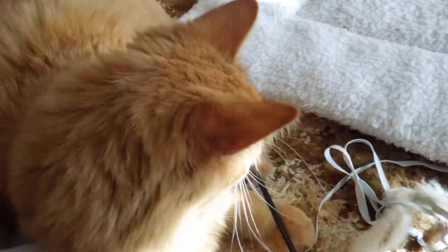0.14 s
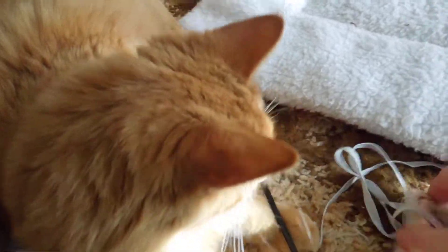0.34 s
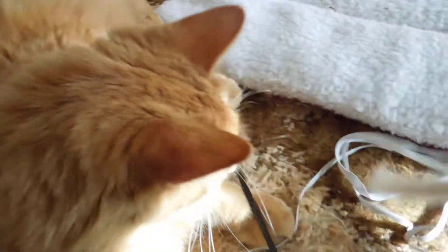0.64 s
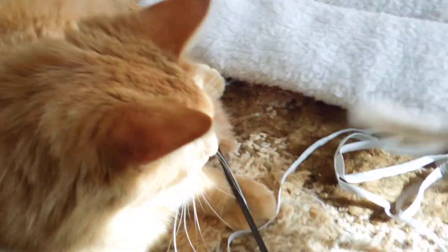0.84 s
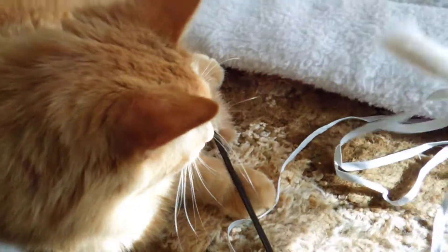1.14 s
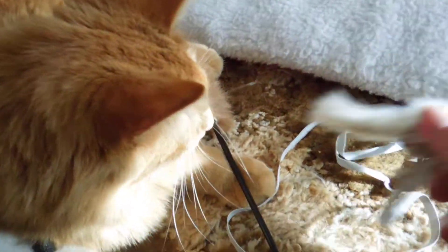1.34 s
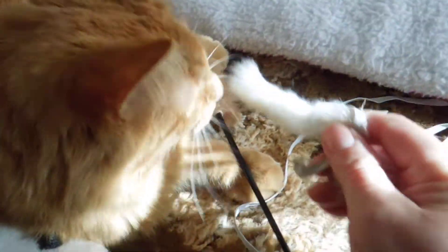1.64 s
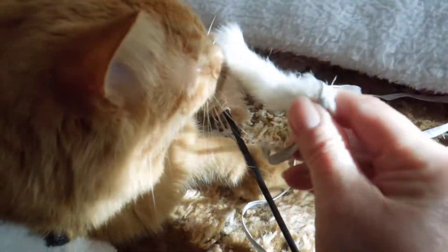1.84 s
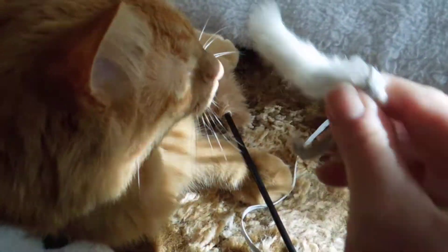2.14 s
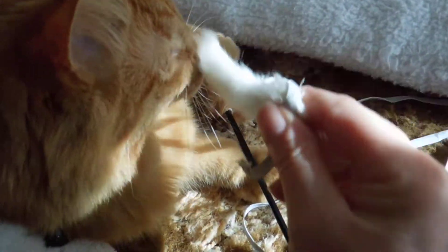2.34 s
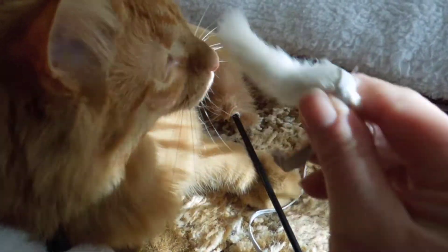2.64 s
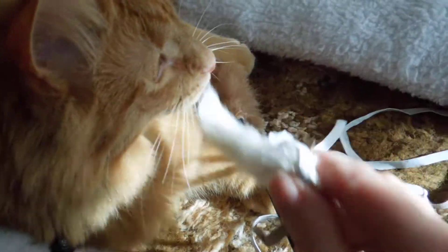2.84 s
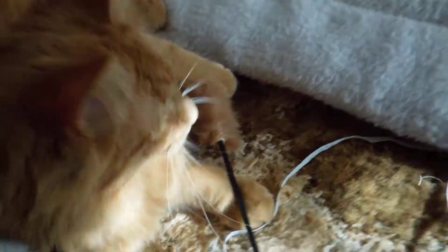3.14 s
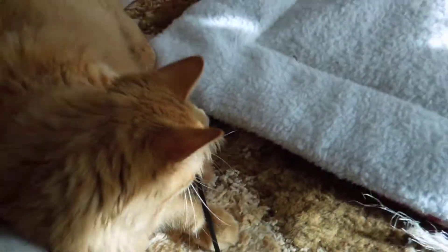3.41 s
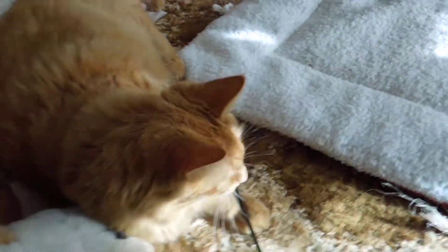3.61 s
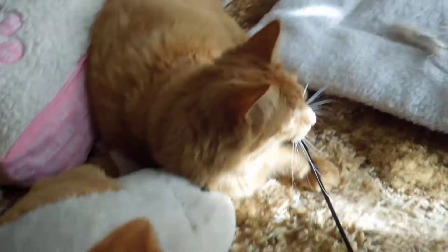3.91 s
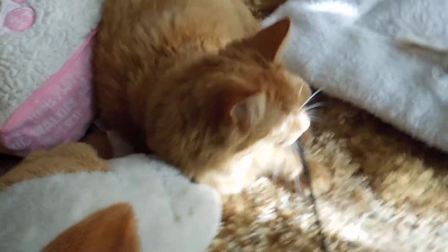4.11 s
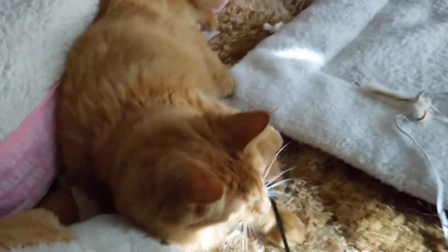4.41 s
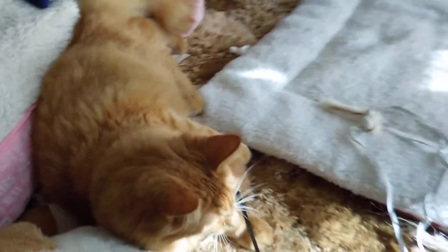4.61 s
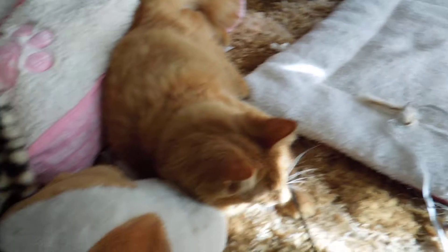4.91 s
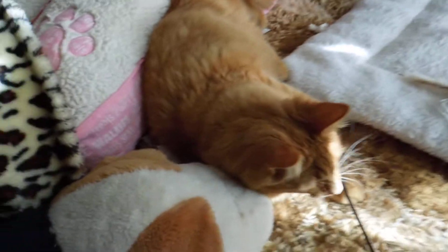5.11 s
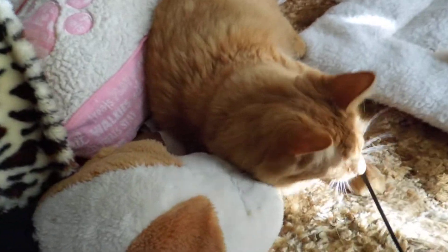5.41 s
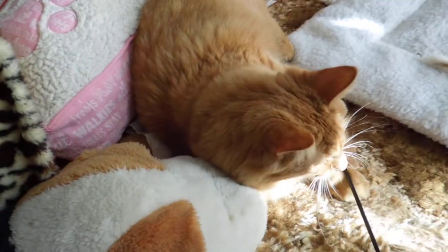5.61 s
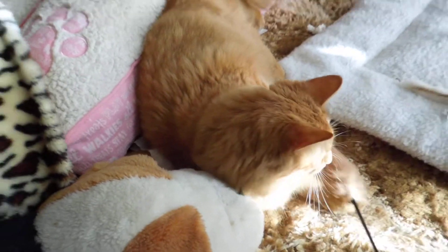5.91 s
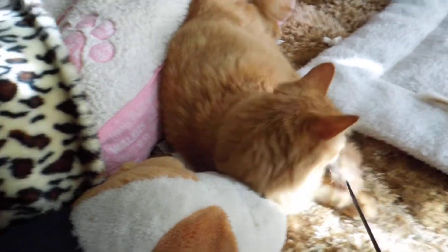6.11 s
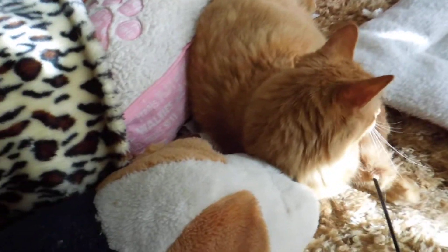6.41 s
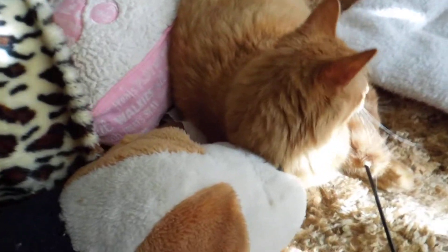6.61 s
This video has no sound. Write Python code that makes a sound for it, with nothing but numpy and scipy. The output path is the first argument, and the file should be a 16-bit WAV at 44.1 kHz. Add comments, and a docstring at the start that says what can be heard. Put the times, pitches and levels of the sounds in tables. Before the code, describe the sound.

Quiet indoor play heard at arm's length through a small stereo camera with low rumble and hiss. A thin crisp plastic-like toy ticks sparsely while fur and ribbon whisper over carpet and towel, with two dull soft bumps. A short group of snaps leads to a dense, sharp crinkle, by far the loudest moment. It falls back to isolated bright clicks, faint rustles and soft handling thumps, with a short dry room tail.

```python
"""Cat with a crinkly wand toy

A cat lies on a carpet and bites and paws a crinkly wand toy, an arm's length from a small camera.
Creases in the toy snap singly or in showers of random clicks, coloured by film, crease and hollow body.
Fur and ribbon brush over carpet and towel as swelling grain noise; soft bumps are short decaying modes.
A soft-furnished room adds a short noise tail; the camera adds hiss and a few low handling rumbles."""
import sys
import numpy as np
from scipy import signal
from scipy.fft import rfft, irfft
from scipy.io import wavfile
from scipy.ndimage import uniform_filter1d

SR = 44100
rng = np.random.default_rng(int(sys.argv[2]) if len(sys.argv) > 2 else 0)


def dump_mix(stems):
    """Bounce the given channels to the path in sys.argv[1] as a 16-bit WAV at rate SR."""
    frames = np.atleast_2d(stems).T  # one column per channel
    limited = np.clip(frames, -1, 1)  # hard clip at full scale
    pcm = np.round(limited * 32767).astype(np.int16)
    wavfile.write(sys.argv[1], SR, pcm)


N = 297675  # length in samples


def undb(db):
    """Decibels to amplitude gain."""
    return 10 ** (np.asarray(db) / 20)


def unit(x):
    """Scale a signal to an energy of one."""
    return x / np.sqrt(np.sum(x ** 2) + 1e-18)


def add(track, start_s, x):
    """Mix a sound into a track from a start time, cut at the end of the track."""
    i = int(start_s * SR)
    track[i:i + len(x)] += x[:max(N - i, 0)]


def read(points, size):
    """Interpolate a (f/Hz, value) table over log frequency onto the bins of a transform."""
    hz, value = np.transpose(points)
    bins_hz = np.fft.rfftfreq(size, 1 / SR)
    return np.interp(np.log(bins_hz + 1), np.log(hz), value)


def colour(x, spectrum, size=1024):
    """Minimum-phase filter: folding the cepstrum forward puts the energy at the onset."""
    cepstrum = irfft(np.log(undb(read(spectrum, size))))
    cepstrum[1:size // 2] *= 2
    cepstrum[size // 2 + 1:] = 0
    impulse = irfft(np.exp(rfft(cepstrum)))
    return signal.fftconvolve(x, impulse)[:len(x)]


def band(x, hz, width_hz):
    """One resonance with a gain of 1 at its centre."""
    b, a = signal.iirpeak(min(hz, SR / 3), hz / width_hz, fs=SR)
    return signal.lfilter(b, a, x)


def grains(n, rate, spread_db):
    """Tiny clicks at random times and of random sign, most weak and a few strong; rate per second."""
    chance = rng.random((n, 3))
    fires = chance[:, 0] < rate / SR
    sign = np.sign(chance[:, 1] - .5)
    size = undb(-spread_db * np.log(np.maximum(chance[:, 2], .05)))  # the floor caps the strongest
    return fires * sign * size


def pair(x, other, likeness):
    """Left and right from two unrelated signals, alike by a (f/Hz, likeness 0-1) table."""
    alike = np.clip(read(likeness, len(x)), 0, 1)
    mid = rfft(x) * np.sqrt((1 + alike) / 2)
    side = rfft(other) * np.sqrt((1 - alike) / 2)
    return irfft(np.array([mid + side, mid - side]), len(x))


def toy():
    """Creases buckle singly or in showers; returns the direct sound and the part that fills the room."""
    # ringing of toy and wand, added to the plain sound: f/Hz, width/Hz, level/dB
    rings = [(1360, 97, -29), (3010, 18, -1.5), (4590, 40, 0), (6600, 90, -19), (7000, 62, 0),
             (7740, 100, -1), (8300, 70, 2)]
    snap_room_db = -5.5  # a single snap fills the room less than a shower does
    low_hz = 325  # the toy is too small to radiate below this

    single, showers = snaps(), scrunches()
    out = np.array([single + showers, undb(snap_room_db) * single + showers])
    highpass = signal.butter(2, low_hz, "high", fs=SR, output="sos")
    out = signal.sosfilt(highpass, out)
    return out + sum(undb(db) * band(out, hz, width_hz) for hz, width_hz, db in rings)


def snaps(buckle_s=0.00039, rattle_s=0.0029, rattle_db=-8):
    """One crease buckles as a very short noise burst, and its neighbours rattle as they give way."""
    # single snaps: t/s, level/dB (energy as if held over one millisecond), crease pitch f/Hz,
    # hollow body against film/dB
    snap_list = [(0.5184, -34, 2480, -6), (0.5219, -28.5, 5800, -5), (0.5894, -32.5, 10200, -18),
                 (1.3196, -41, 9100, -20), (2.1996, -41.5, 7560, -3), (2.9941, -37.5, 5300, -5),
                 (3.0492, -36, 10000, -8), (3.3944, -26, 1500, -14), (3.4004, -27.5, 7900, -13),
                 (3.4557, -31.5, 9100, -7), (3.4583, -38, 1500, -3), (3.4670, -37, 10400, -18),
                 (3.697, -40, 5100, -9), (3.9602, -34, 8500, -17), (4.2185, -20.5, 8150, -15),
                 (4.2474, -17, 5500, -11.5), (4.2565, -13.5, 9600, -25), (4.2621, -14, 7300, -24),
                 (4.2664, -9.5, 7660, -27), (4.3030, -18.5, 11300, -7), (4.4506, -30, 8650, -15),
                 (4.7770, -30.5, 6200, -12), (5.0158, -27, 10700, -21), (5.8065, -25.5, 11800, -18),
                 (5.8113, -36, 5200, -10), (5.8224, -26, 11600, -24)]
    out = np.zeros(N)
    t = np.arange(SR // 10) / SR
    millisecond = SR / 1000  # in samples
    for s, db, hz, body_db in snap_list:
        buckle = unit(rng.choice([-1, 1], len(t)) * np.exp(-t / buckle_s))
        rattle = unit(grains(len(t), 6400, 15.0) * np.exp(-t / rattle_s))
        push = buckle + undb(rattle_db) * rattle
        snap = crease(push, hz, body_db, width_hz=820, pitch_db=0.0)
        add(out, s, undb(db) * np.sqrt(millisecond) * snap)
    return out


def scrunches(lead_s=.035):
    """Pressure grows to a peak and relaxes; tiny creases and a few larger cracks follow it."""
    # squeezes of the toy: peak t/s, rise/s, fade/s, peak level/dB, crease pitch f/Hz,
    # hollow body against film/dB
    squeezes = [(3.3957, 0.00035, 0.017, -34.5, 11200, -8), (3.699, .002, 0.022, -43, 5130, -9),
                (4.197, .0003, 0.0088, -28, 7900, -5), (4.221, 0.0084, 0.034, -26, 8900, -11.5),
                (4.265, 0.015, 0.015, -22, 7400, -12), (4.303, 0.0079, 0.019, -21, 10400, -16),
                (4.322, 0.0075, 0.0094, -22.5, 9200, -11.5), (4.41, .02, 0.046, -42.5, 10100, -8.5),
                (5.0142, 0.00085, .013, -27, 7400, -17.5), (5.603, 0.0033, 0.013, -41, 11000, -20),
                (5.8055, 0.00053, 0.017, -29.5, 6350, -21), (5.934, 0.0032, 0.0043, -39.5, 9000, -15),
                (6.014, 0.012, 0.017, -49, 11000, -16), (6.403, 0.0024, .022, -44.5, 10700, -10.5)]
    tiny_per_s, tiny_spread_db = 10000, 2.5
    # now and then a larger crease gives way; its level is against the tiny ones
    cracks_per_s, crack_spread_db, crack_db = 400, 2.5, -6.5

    out = np.zeros(N)
    t = np.arange(SR // 4) / SR - lead_s  # zero at the peak
    for s, rise_s, fade_s, db, hz, body_db in squeezes:
        squeeze = np.exp(-np.abs(t) / np.where(t < 0, rise_s, fade_s))
        tiny = unit(grains(len(t), tiny_per_s, tiny_spread_db))
        cracks = unit(grains(len(t), cracks_per_s, crack_spread_db))
        push = squeeze * (tiny + undb(crack_db) * cracks)
        shower = crease(push, hz, body_db, width_hz=1600, pitch_db=-13.5)
        add(out, s - lead_s, undb(db) * np.linalg.norm(squeeze) * shower)
    return out


def crease(push, hz, body_db, width_hz, pitch_db):
    """A push sounds the whole film, the pitch of its own crease and the hollow body behind it."""
    # bright spectrum of the thin film: f/Hz, level/dB
    film_spectrum = [(300, -49), (1400, -30), (2100, -14), (2750, -3.5), (3700, -3.5), (4600, -3.5),
                     (7000, -0.5), (10500, 2.5), (12500, 2.5), (14200, -7.5)]
    # duller spectrum of the hollow body: f/Hz, level/dB
    body_spectrum = [(80, -7), (300, -8), (800, -2), (1450, -0.5), (1950, 2), (2350, 1.5), (2900, 2),
                     (5500, -24.5), (14000, -46)]
    whole = unit(colour(push, film_spectrum))
    pitch = unit(band(push, hz, width_hz))
    film = unit(whole + undb(pitch_db) * pitch)
    body = unit(colour(push, body_spectrum))
    return unit(film + undb(body_db) * body)


def brushing():
    """Fur and ribbon over cloth: clear strokes, and faint ones at uneven intervals while things stir."""
    # clear strokes: middle t/s, length/s, fibre level/dB, cloth against fibres/dB
    brushes = [(0.51, 0.074, -52, -10), (0.618, 0.17, -54.5, -20), (0.807, 0.068, -49, -25),
               (0.891, 0.075, -50, -25), (1.109, 0.078, -54.5, -10), (1.349, .14, -51, -12),
               (3.004, 0.07, -53, -6), (3.26, 0.11, -53.5, -5), (3.611, .42, -54.5, 1),
               (3.97, .14, -52, -3.5), (4.136, 0.22, -65, 11.5), (5.143, .1, -53, -2.5),
               (5.35, 0.35, -60, 2), (6.111, 0.36, -61, -3)]
    # spells when the ribbon or the cat is moving: from t/s, to t/s
    stirring = [(1.05, 1.65), (4.5, 4.75)]
    stir_per_s, stir_length_s = 8, 0.097
    stir_db, stir_spread_db, stir_body_db = -60, 1.5, -15

    out = np.zeros(N)
    for s, length_s, db, body_db in brushes:
        add(out, s - length_s / 2, stroke(length_s, db, body_db))
    for start, end in stirring:
        for s in np.arange(start, end, 1 / stir_per_s):
            middle = s + rng.uniform(-.5, .5) / stir_per_s
            db = stir_db + stir_spread_db * rng.standard_normal()
            add(out, middle - stir_length_s / 2, stroke(stir_length_s, db, stir_body_db))
    return out


def stroke(length_s, db, body_db):
    """Fibres catch and let go by the thousand; a heavier stroke also moves the cloth beneath."""
    # bright spectrum of the fibres: f/Hz, level/dB
    fur = [(300, -22), (2500, -5), (5000, -0.5), (7500, -1.5), (11000, 6.5), (12500, 2), (14200, -3)]
    # low spectrum of the cloth: f/Hz, level/dB
    cloth = [(60, -14), (200, -3), (600, -3), (1400, -7), (3000, -11), (5000, -12), (12000, -24.5)]
    fibres = grains(SR, rate=9000, spread_db=4.0)[:int(length_s * SR)]
    fibres = fibres * np.sin(np.linspace(0, np.pi, len(fibres)))  # swell and fade
    sound = unit(colour(fibres, fur)) + undb(body_db) * unit(colour(fibres, cloth))
    return undb(db) * np.sqrt(len(fibres) / 2) * sound


def bumps(rise_cycles=0.24):
    """Soft contacts of paw and wand swing up and die away; a harder one favours the higher modes."""
    # contacts: t/s, level of the lowest mode/dB, hardness/dB per octave
    contacts = [(0.523, -48, -1), (0.912, -45, 0.8)]
    # what a bump rings with: f/Hz, t60/s
    modes = [(275, 0.061), (780, 0.036), (1500, 0.0092)]
    out = np.zeros(N)
    t = np.arange(SR // 2) / SR
    for s, db, hardness_db in contacts:
        for hz, t60_s in modes:
            drift = unit(band(rng.standard_normal(len(t)), hz / 4, hz / 2)) * np.sqrt(len(t))
            wobble = 1 + 0.53 * drift  # the pitch strays around the mode
            tone = np.sin(2 * np.pi * hz * np.cumsum(wobble) / SR)
            swing = (1 - np.exp(-t * hz / rise_cycles)) * np.exp(-np.log(1000) * t / t60_s)
            size = undb(db + hardness_db * np.log2(hz / modes[0][0]))
            add(out, s, size * np.sqrt(2) * swing * tone)
    return out


def room(direct, spread):
    """Direct sound and a short noise tail, heard alike by the two close ports except in the treble."""
    t60_s, tail_db, delay_s = 0.2, -7.5, 0.0048
    likeness = [(1400, 1.0), (3000, 1.0), (5500, 0.7), (8000, .1), (14000, 0.44)]
    t = np.arange(SR // 2) / SR
    fade = (t > delay_s) * np.exp(-np.log(1000) * t / t60_s)
    first, second = (unit(fade * rng.standard_normal(len(t))) for _ in range(2))
    tails = pair(first, second, likeness)
    return np.array([direct + undb(tail_db) * signal.fftconvolve(spread, tail)[:N] for tail in tails])


def ports(x, right_hz=11200, right_width_hz=2200, right_db=-4, scatter_db=-7, lag_share=0.82):
    """Sound reaches the left port a little later; the right port rings in the treble."""
    left, right = x
    late = np.exp(-2j * np.pi * np.fft.rfftfreq(N) * lag_share)  # lag as a share of one sample
    left = irfft(rfft(left) * late, N)
    right = right + undb(right_db) * band(right, right_hz, right_width_hz)
    # the treble of toy and brushing wanders quickly and at random between the two ports
    drift = unit(uniform_filter1d(rng.standard_normal(N), size=120))
    balance = np.tanh(np.sqrt(N) * drift)
    scatter = undb(scatter_db) * balance * band(x[0], 12000, 6000)
    return np.array([left + scatter, right - scatter])


def handling(width_share=1.0):
    """The grip creeps on the housing: each shift swells and fades as a low rumble."""
    # shifts of the hand on the camera: middle t/s, length/s, level/dB, centre f/Hz
    shifts = [(3.989, .13, -55.5, 232), (4.175, 0.18, -53, 242), (5.347, 0.18, -48.5, 61.5),
              (5.53, .2, -46.5, 44)]
    out = np.zeros(N)
    for s, length_s, db, hz in shifts:
        width_hz = width_share * hz
        rumble = band(band(rng.standard_normal(SR), hz, width_hz), hz, width_hz)
        rumble = rumble[:int(length_s * SR)]
        swell = np.sin(np.linspace(0, np.pi, len(rumble)))
        add(out, s - length_s / 2, undb(db) * np.sqrt(len(rumble) / 2) * unit(swell * rumble))
    return out


def air(level_db=-50):
    """Low room rumble shared by both sides under each microphone's own steady hiss."""
    # background spectrum: f/Hz, level/dB
    air_spectrum = [(12, -28), (20, -1), (65, -6.5), (119, -8.5), (156, -9.5), (242, -11), (419, -12.5),
                    (468, -12), (1290, -17.5), (1400, -17.5), (1890, -18.5), (2930, -21), (14000, -26)]
    # how alike left and right are: f/Hz, likeness/0-1
    air_likeness = [(30, 0.2), (60, 1), (130, 0.4), (290, 0.17), (640, 0.09), (14000, 0.01)]
    gain = undb(read(air_spectrum, N))
    first, second = (unit(irfft(rfft(rng.standard_normal(N)) * gain, N)) for _ in range(2))
    return undb(level_db) * np.sqrt(N) * pair(first, second, air_likeness)


def scene():
    """The cat's play in the room, over the quiet background."""
    direct, spread = toy() + brushing()
    return ports(room(direct, spread)) + bumps() + handling() + air()


def record(dry):
    """The camera rounds the loudest peaks and cuts the top steeply."""
    top_hz = 14300
    lowpass = signal.ellip(10, .2, 70, top_hz, fs=SR, output="sos")
    return signal.sosfilt(lowpass, np.tanh(dry))


dry = scene()
out = record(dry)
dump_mix(out)
```